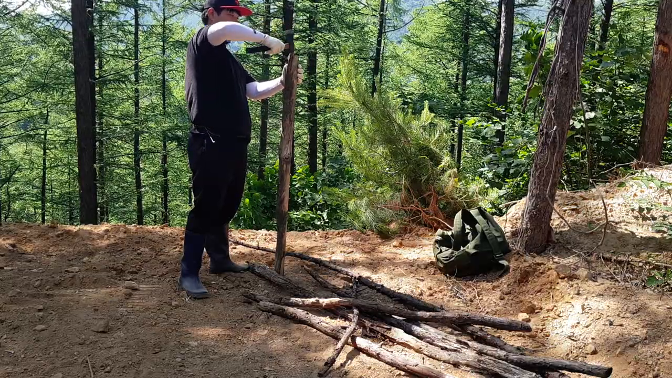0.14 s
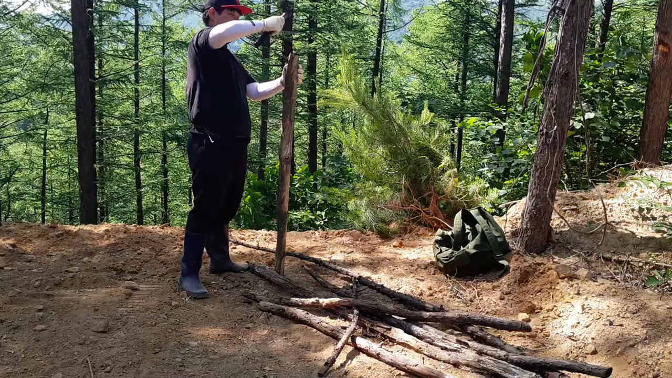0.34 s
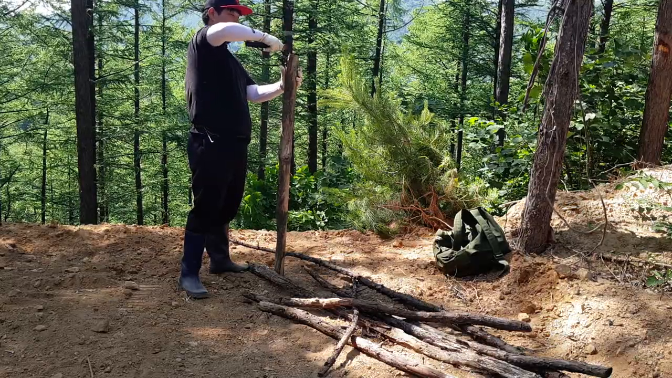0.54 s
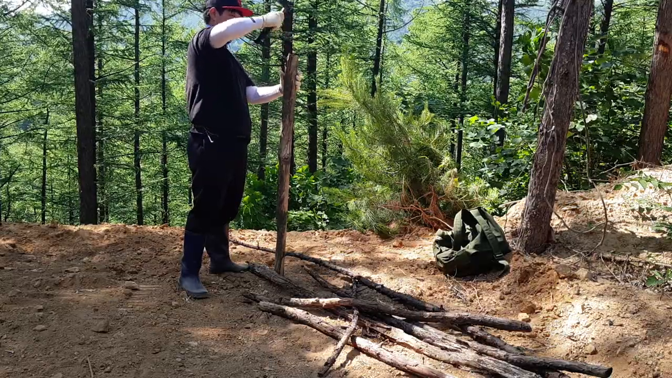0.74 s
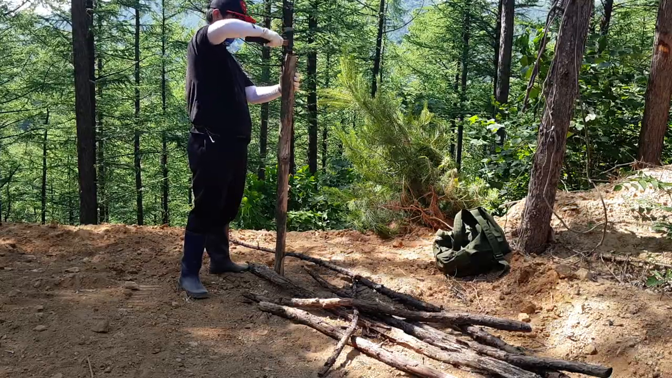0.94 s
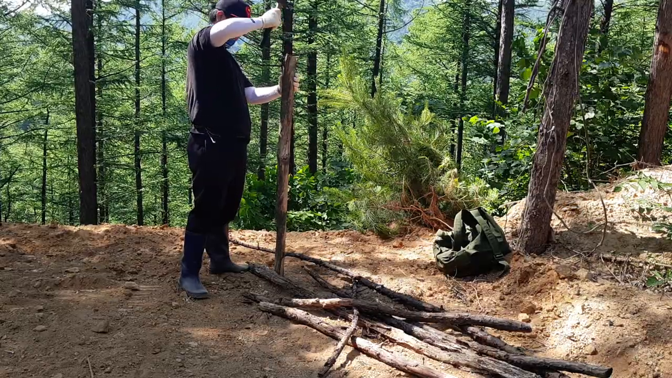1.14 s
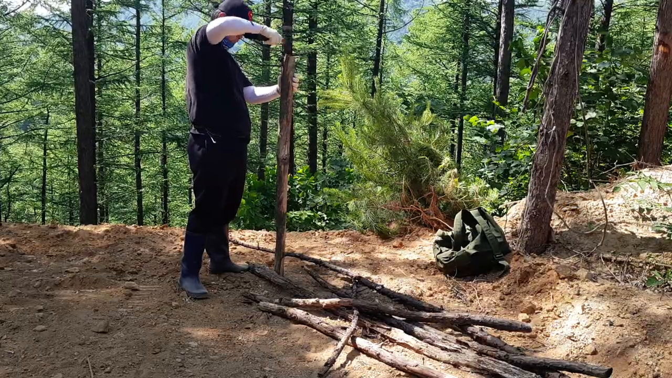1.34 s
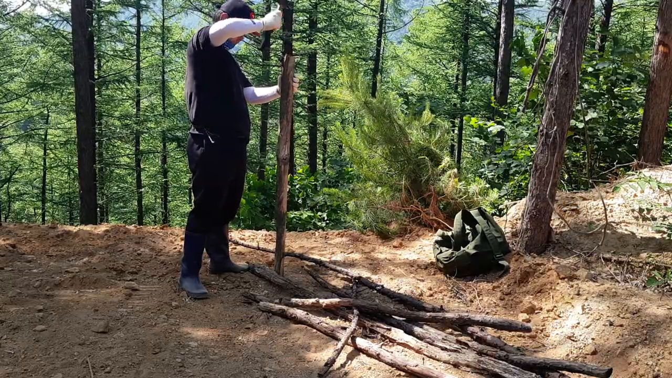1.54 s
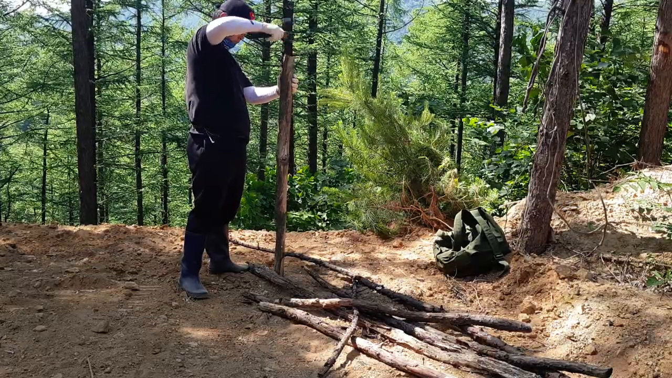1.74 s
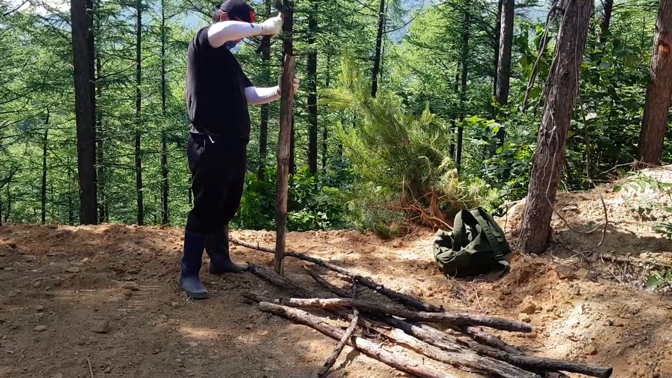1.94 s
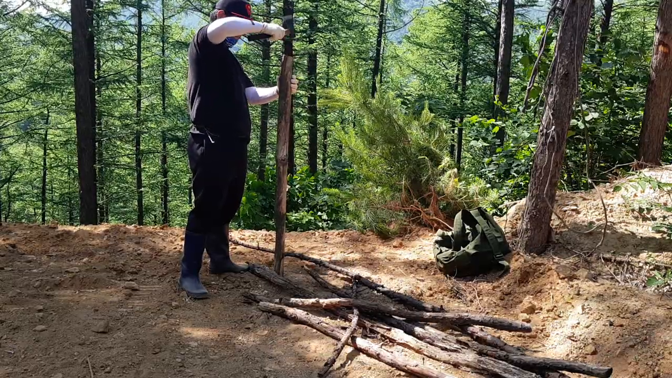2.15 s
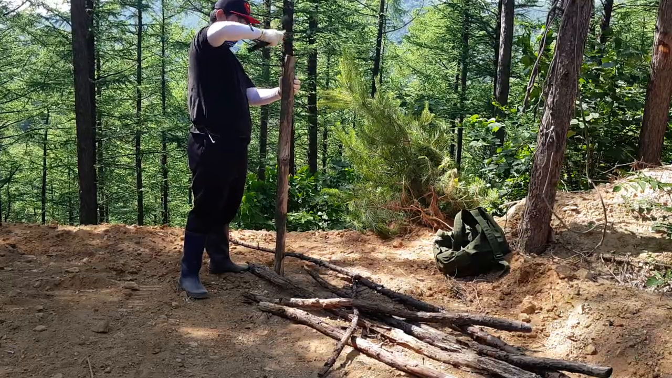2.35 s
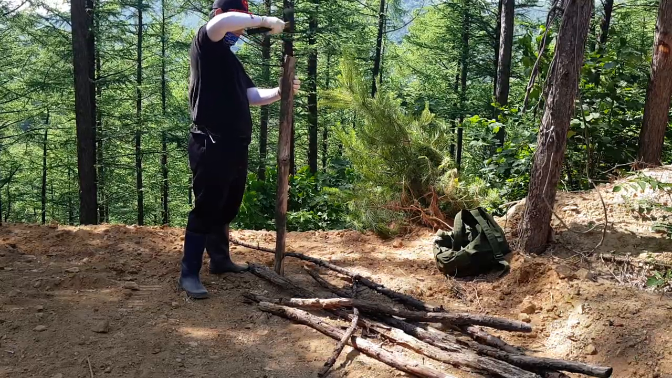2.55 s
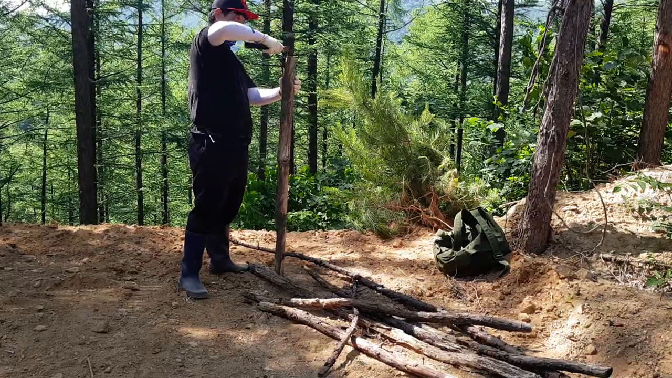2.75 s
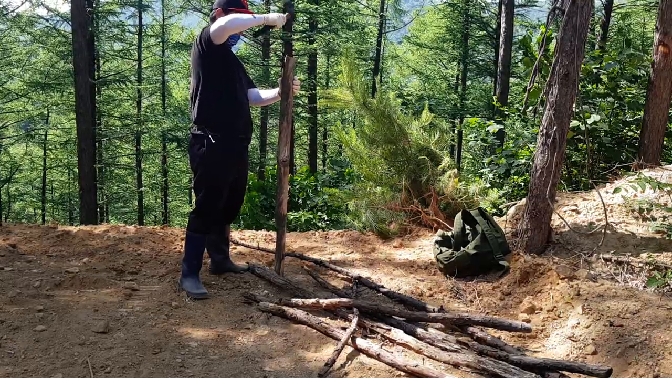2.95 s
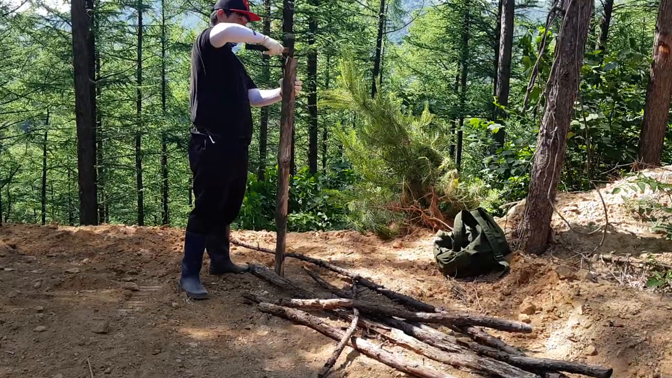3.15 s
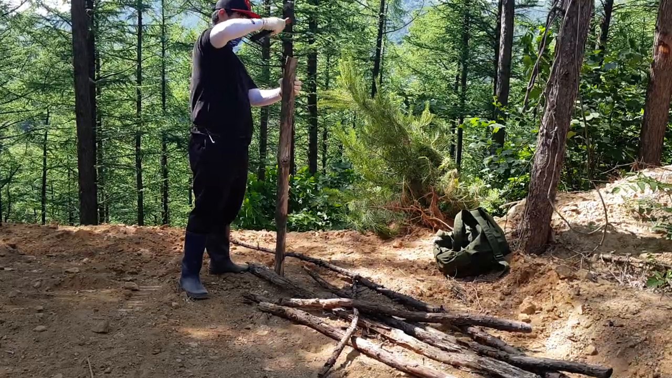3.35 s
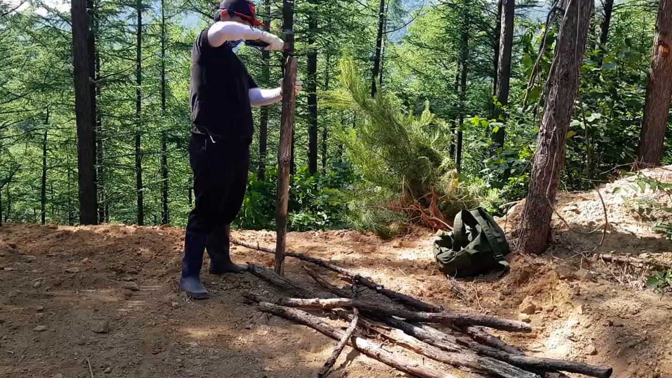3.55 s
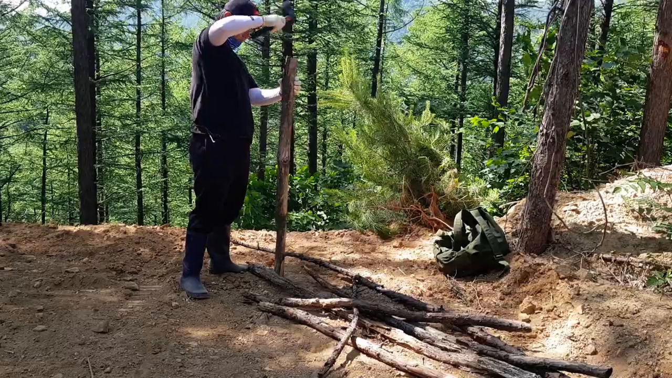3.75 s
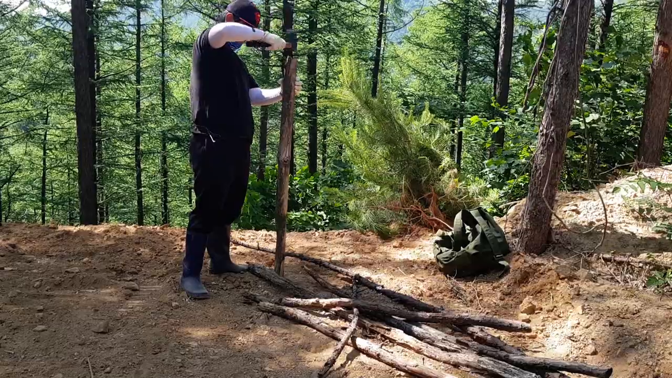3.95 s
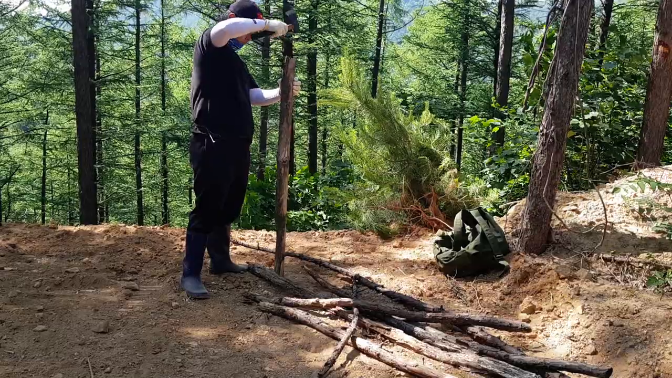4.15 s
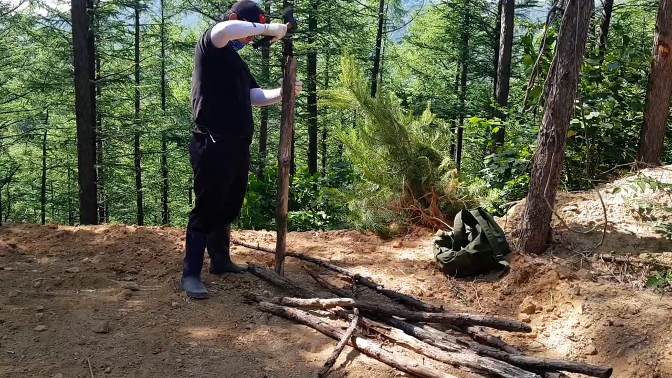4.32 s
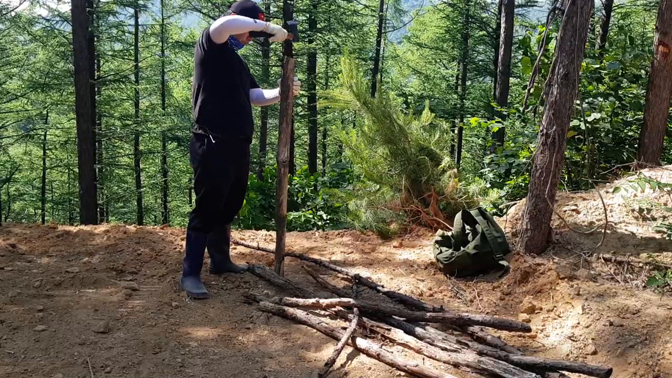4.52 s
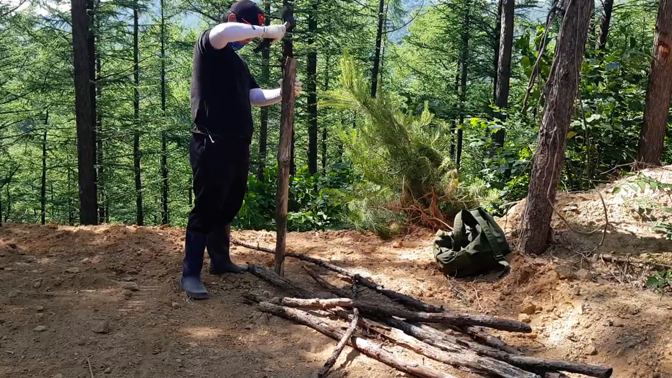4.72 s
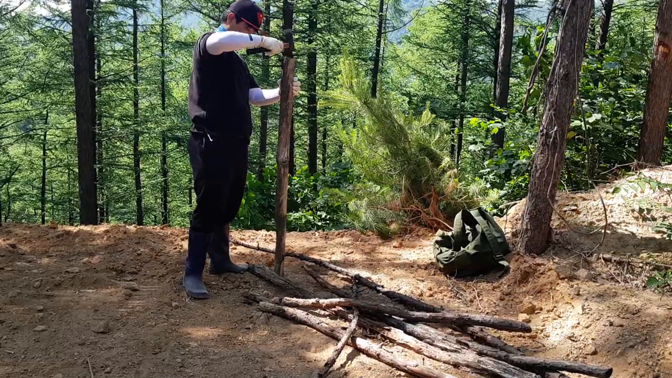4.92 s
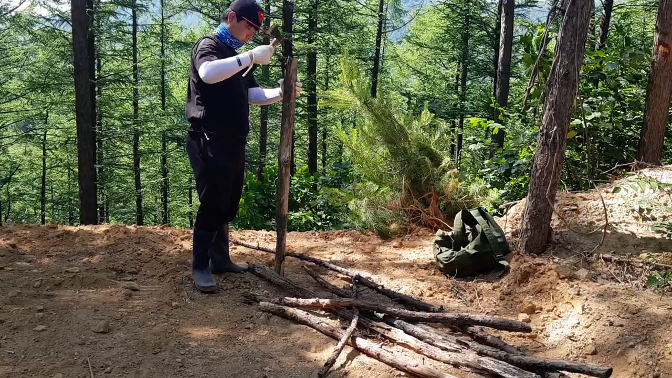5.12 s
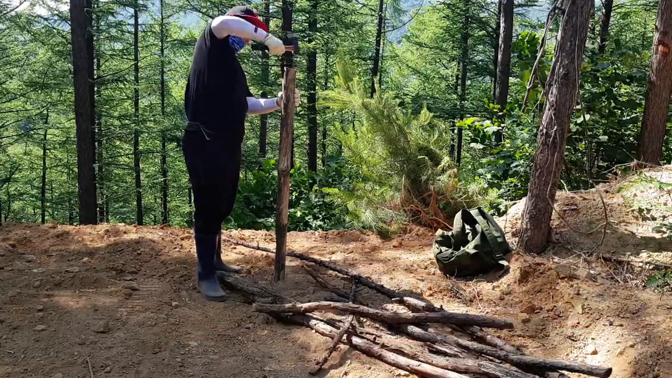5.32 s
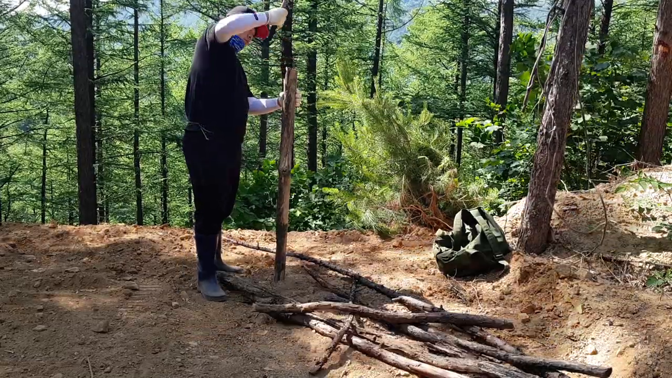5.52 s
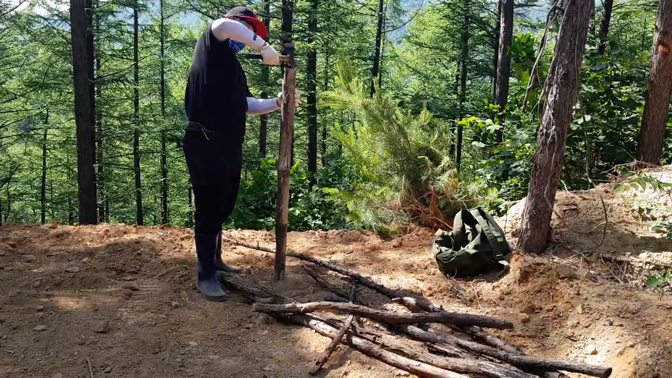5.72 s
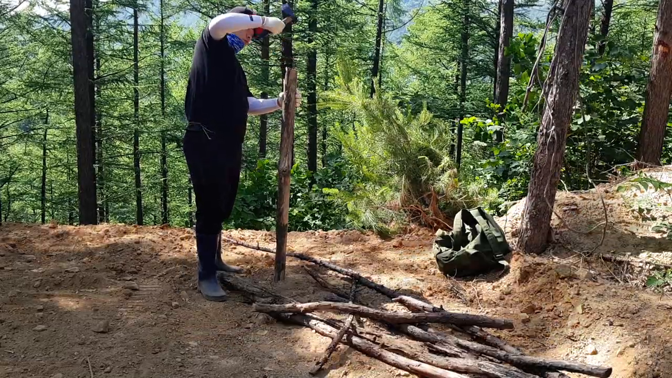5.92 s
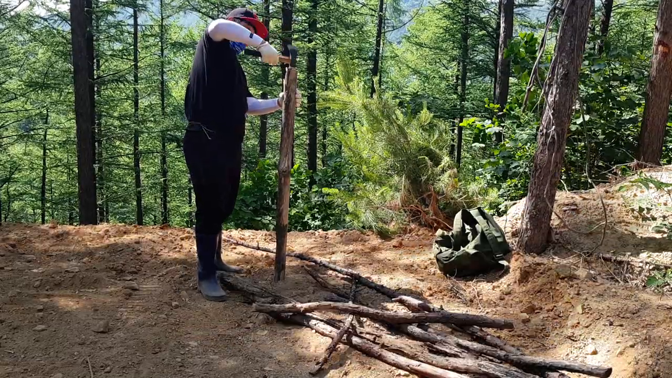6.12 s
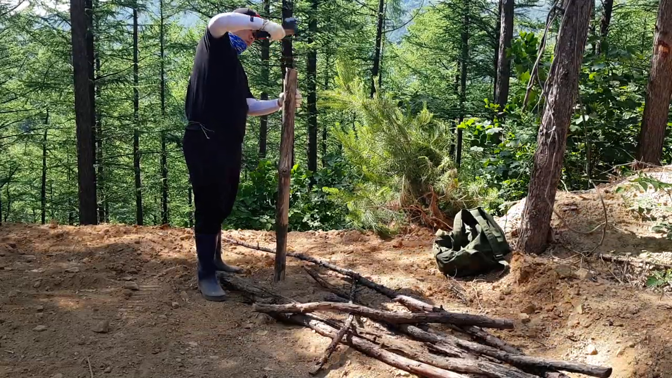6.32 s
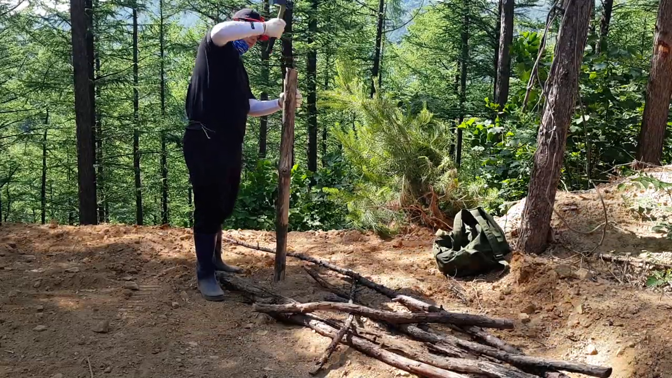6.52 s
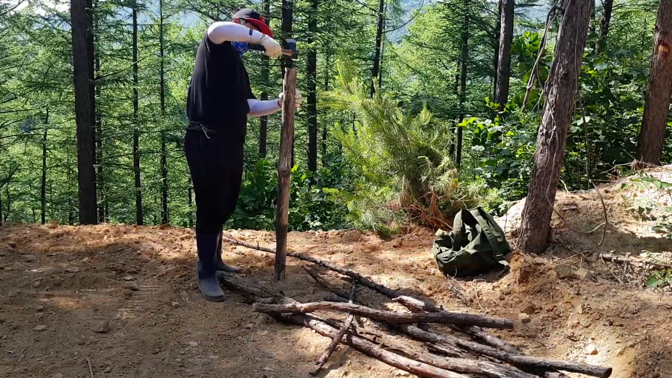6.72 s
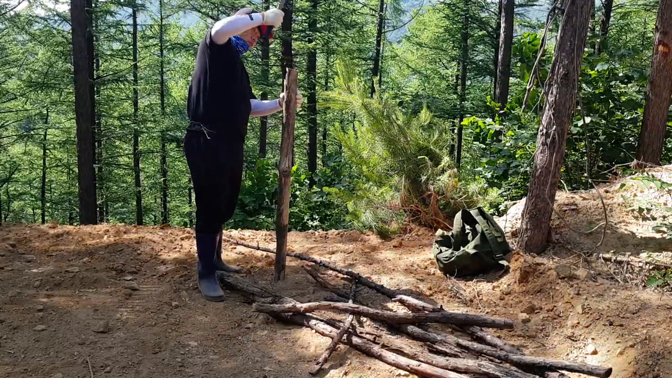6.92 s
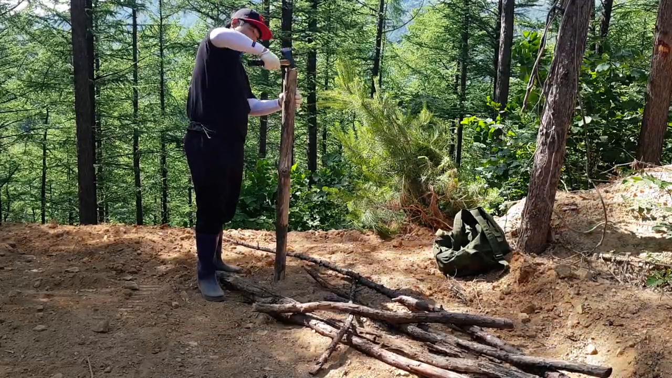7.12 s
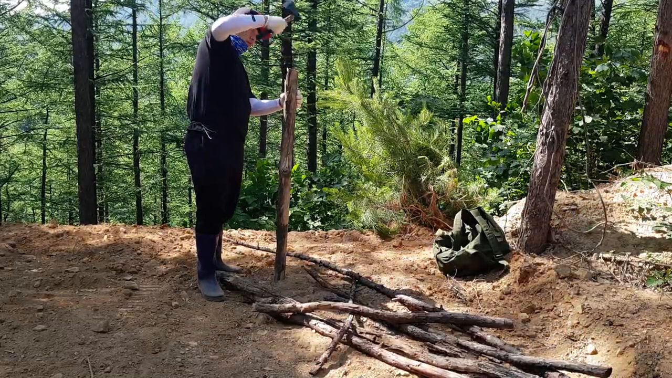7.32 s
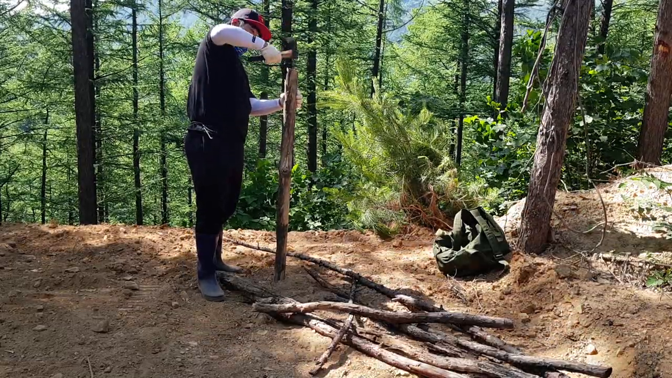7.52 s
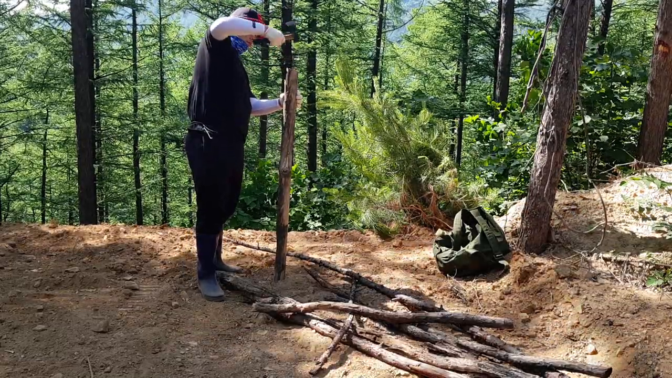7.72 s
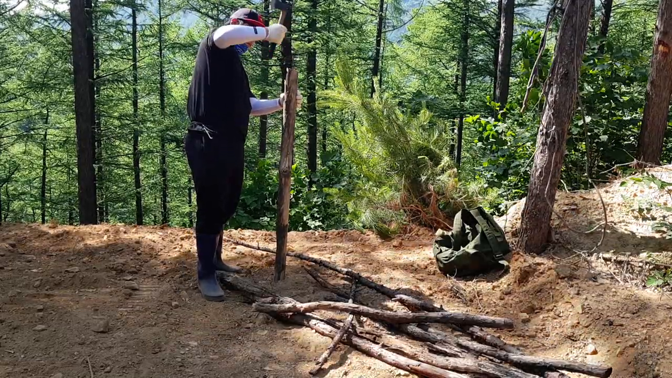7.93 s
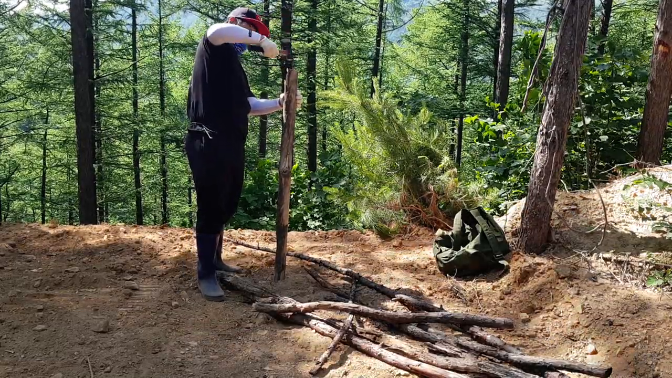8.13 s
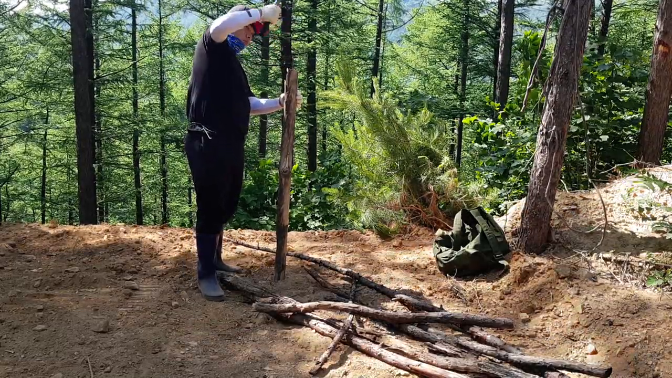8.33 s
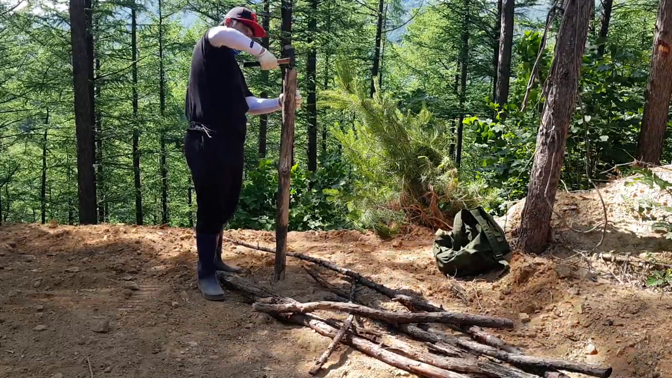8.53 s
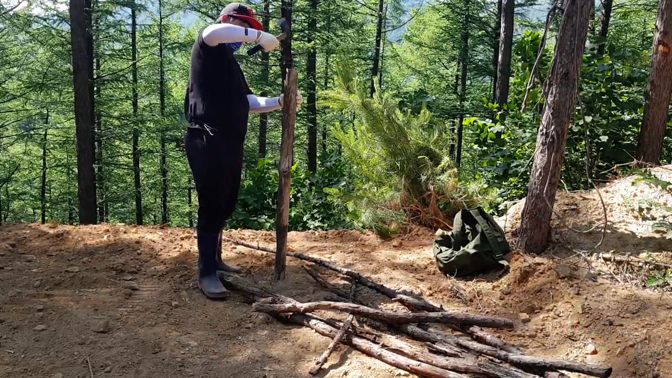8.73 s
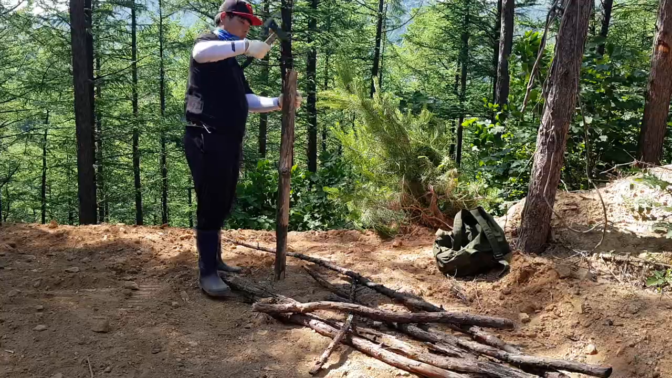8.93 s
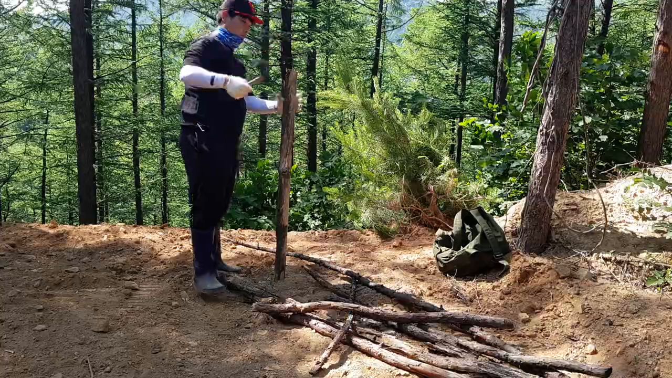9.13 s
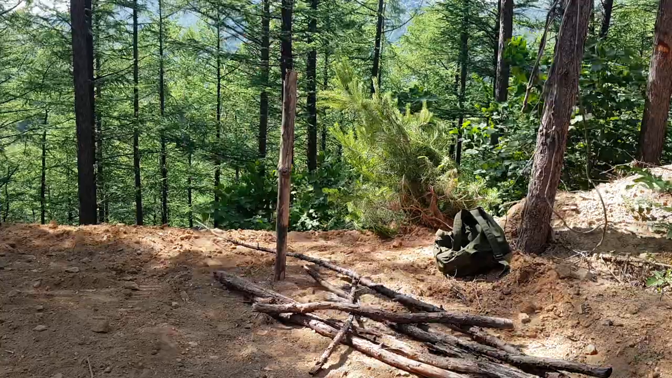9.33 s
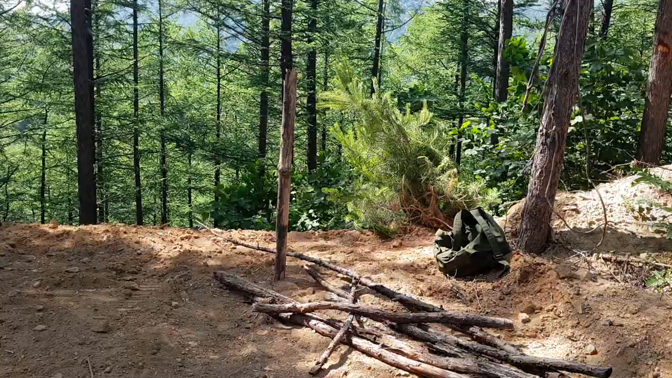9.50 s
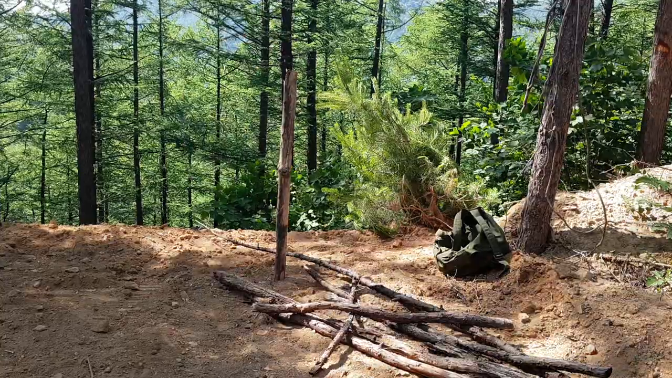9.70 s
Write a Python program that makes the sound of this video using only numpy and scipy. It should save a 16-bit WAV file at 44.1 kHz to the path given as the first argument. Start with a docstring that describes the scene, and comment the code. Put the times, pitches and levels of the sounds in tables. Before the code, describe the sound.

The scene opens on the fading echo of an earlier blow in a forest. From 0.16 s a hammer hits a wooden stake a few metres away, a little left, roughly every 0.4 s. Each hit is a short woody crack with a slight steel ping, a soft low thud in the soil and a scattered half-second echo from the trees; force and brightness vary. A far, hoarse crow caws once at 0.15-0.5 s. Low wind flutters on the microphone, strongest around 1-3 s, moving left to right. Very faint rising bird whistles come at 2.3 and 3.05 s, small knocks at 2.8 and 4.85 s. Sound drops out at 5.27-5.39 s, cutting the start of a strong blow. Blows continue about every 0.45 s, slightly lower toned, until a last strong one at 8.6 s. Its echo fades; after a tiny dropout at 9.25 s, light hiss, faint breeze and soft scuffs remain.

```python
"""In a conifer forest, a few metres from the microphone, a wooden stake is hammered into the earth.
Each blow is a noise crack, decaying sines for the wood and the steel head, and a sinking thump in the soil.
Sparse random echoes stand for the trunks that scatter it back; small ticks fall between the blows.
Filtered noise makes wind rumble at the microphone and a faint hiss of air. Far off, a crow's harmonics
make one caw and a small bird whistles upward in gliding sines. The sound drops out twice."""
import sys
import numpy as np
from scipy import signal
from scipy.fft import rfft, irfft
from scipy.io import wavfile
from scipy.ndimage import uniform_filter1d

SR = 44100
rng = np.random.default_rng(int(sys.argv[2]) if len(sys.argv) > 2 else 0)


def wav_record(signal):
    """Record a signal, one row per channel, as 16-bit PCM in the file named by sys.argv[1]."""
    frames = np.transpose(np.atleast_2d(signal))
    bounded = np.clip(frames, -1, 1)
    # unit amplitude maps onto the largest positive 16-bit level
    quanta = np.round(bounded * 32767).astype(np.int16)
    wavfile.write(sys.argv[1], SR, quanta)


N = 434826
TIME = np.arange(N) / SR
PORTS = 2  # left and right of the microphone

# Hammer blows on the stake, a few metres off. Each row: start in seconds, force in dB,
# belly in dB (the low modes of the wood), squareness in dB (a square hit is brighter), rebound delay
# in seconds, frequency favoured by the landing spot in Hz, lower and upper ping of the head in dB
# (added to the head's own levels).
BLOWS = [(0.16, 0, -6, -5.5, 0.0022, 3650.0, -14.5, -9.0), (0.514, -5, 6, -0.5, 0.0018, 1772, -9.5, -16.5),
         (0.917, 5, -8, -3.5, 0.001, 2700.0, 3, -18.5), (1.2763, -13.0, 29.5, 15.5, 0.0025, 1573, 3, -1.5),
         (1.656, 3.5, -14.5, 0.5, 0.0011, 1364, 3.5, -14), (2.031, 0, -2, 2.5, 0.0025, 1810, -5, -4.5),
         (2.404, -2, 8, 11.5, 0.0006, 800.0, -0.5, 3.0), (2.779, -2.5, 6, 14.5, 0.0028, 3650.0, -0.5, 9.0),
         (3.18, -4, 14, 15, 0.0032, 3760, 2.5, -4), (3.5884, -3.0, 10.5, 12.5, 0.00062, 3650.0, -9, -1),
         (3.992, -1, -0.5, 8.5, 0.0015, 3650.0, -13.5, 13.5),
         (4.3958, -3.5, 5.5, 19, 0.0014, 1820, -13, -0.5),
         (4.7944, -9.0, 18.5, 24.5, 0.0013, 1860, -9.5, -21.5), (5.342, 7.5, -9.5, 11, 0.002, 2760, -8, 13),
         (5.7885, -4.0, 14, 19, 0.0007, 1780, 10, 14), (6.2444, 3, 6, 9.5, 0.0037, 1555, 5, 5.0),
         (6.72, -3.5, 12.5, 9, 0.0016, 825, 0.5, 11), (7.178, -3.5, 7.5, -2.5, 0.0023, 2336, -11, 10),
         (7.654, 1.5, -2, 6.5, 0.0023, 1155, -10, -15), (8.11, 1, -8, -1, 0.0018, 974, -22, -10),
         (8.6245, 6.5, -7, 2.5, 0.0023, 1148, -7.5, -1)]


def hammering():
    """Every blow heard direct, through the ground and scattered by the trees."""
    direct, echoes = np.zeros(N), np.zeros((PORTS, N))
    for row in BLOWS:
        s, sound = blow(row)
        add(direct, s, sound)
        add(direct, *thump(row))
        add(echoes, s, nearby(sound))
        add(echoes, *echo(row, sound))
        add(echoes, *linger(row))
    return ports(direct) + echoes


# Modes of the stake. Each row: frequency in Hz, level in dB with the first grip,
# level in dB with the second grip (both before the blow's drive), t60 in seconds.
STAKE_MODES = [(687.0, -30.5, -49.5, 0.072), (813, -22.5, -22.5, 0.024), (973, -18, -24.5, 0.028),
               (1140, -34, -23, 0.028), (1370, -13, -19.5, 0.023), (1760, -28, -19.5, 0.015),
               (1870.0, -24, -32.5, 0.028), (2320, -18.5, -25, 0.031), (2700.0, -20, -25.5, 0.023),
               (3055, -30.5, -29, 0.036), (3076, -29, -26, 0.016), (3656, -31.0, -26, 0.019)]
REGRIP_S = 5.3  # the second grip starts
# Main note of the stake, which sinks as the grip changes. Each row: time in seconds, frequency in Hz.
MAIN_HZ = [(5.3, 1602), (6.1, 1488)]
MAIN_DB, MAIN_T60 = -15, 0.035  # before the blow's drive; s
# Pitches of the steel head's modes in Hz: the first is the lower ping, the rest make the upper ping.
HEAD_HZ = [4434, 5432, 9590]
# Modes of the steel head, in the order of HEAD_HZ. Each row: level in dB before the blow's ping level,
# t60 in seconds.
HEAD_MODES = [(-45, 0.18), (-47, 0.096), (-68.5, 0.28)]
# Colour of the contact crack. Each row: frequency in Hz, relative density in dB per Hz.
CRACK_COLOUR = [(100, -21), (300, -2.5), (1400, 2.5), (3000, -7.5), (5500, -13), (7500, -27), (12000, -26),
                (16000, -36)]
FAVOUR_DB, FAVOUR_WIDTH_HZ = 7, 150  # the landing spot drives the modes near one frequency harder


def blow(row, contact=0.0016, again=0.49, crack_db=-17.0, crack_t60=0.032, rattle=.9):
    """The head meets the stake, bites, and meets it again: wood and steel modes ring, the fibres crack."""
    s, *_, rebound, favoured_hz, lower_db, upper_db = row
    t = seconds(.5)
    grip_modes = [(hz, first if s < REGRIP_S else second, t60) for hz, first, second, t60 in STAKE_MODES]
    modes = sorted(grip_modes + [(*curve(MAIN_HZ, s), MAIN_DB, MAIN_T60)])
    wood = np.zeros(len(t))
    for k, (hz, db, t60) in enumerate(modes):
        favour = FAVOUR_DB * np.exp(-np.square((hz - favoured_hz) / FAVOUR_WIDTH_HZ))
        # neighbouring bending modes start in opposite directions
        wood += (-1) ** k * ring(t, hz, db + colour(row, hz) + favour, t60)
    # the second contact feeds some modes and checks others
    second_contact = np.interp(t - rebound, t, wood, left=0)
    wood = (wood + again * second_contact) / np.hypot(1, again)

    steel = np.zeros(len(t))
    for k, (hz, (db, t60)) in enumerate(zip(HEAD_HZ, HEAD_MODES)):
        steel += ring(t, hz, db + (upper_db if k else lower_db), t60)
    steel *= 1 + rattle * noise(len(t), below(90))  # the ring is rough

    crack = noise(len(t), lambda f: read(CRACK_COLOUR, f))
    fibres = coloured(crack, lambda f: colour(row, f))
    fibres *= gain_of(crack_db) * decay(t, crack_t60)
    return s, (wood + steel + fibres) * np.minimum(t / contact, 1)


# How a blow drives the wood. Each row: frequency in Hz, then the slopes in dB per dB of force,
# dB per dB of belly and dB per dB of squareness.
DRIVE = [(453, 1, 0.4849, -0.2), (1020, 1, 0.5622, 0), (1630, 1, 0.1743, 0), (2490, 1, 0, 0.8944),
         (4500, 1.1, 0, 0.6481)]


def colour(row, hz):
    """Drive in dB: it grows with force; where and how squarely the head lands favours low or high modes."""
    f, *slopes = np.transpose(DRIVE)
    return sum(amount * read(np.transpose([f, slope]), hz) for amount, slope in zip(row[1:4], slopes))


def thump(row, db=-31.0, arrival=0.016, width=0.0082, start_hz=150, end_hz=55, sag=0.016):
    """The soil takes the push; its slow low waves arrive after the fast ones."""
    t = seconds(.125)
    hz = end_hz + (start_hz - end_hz) * np.exp(-t / sag)
    swell = np.exp(-np.square((t - arrival) / width)) * np.minimum(t / 0.013, 1)
    return row[0], gain_of(db) * swell * sine(np.cumsum(hz) / SR)


# The stake stands to the left of the microphone. Each row: frequency in Hz, left over right in dB.
SIDE_DB = [(80, 0.5), (350, 4.5), (1500, 4.5), (4500, 6.5), (8000, -0.5)]


def ports(x, turn_hz=8500, spread=0.23, treble_turn=1.9):
    """Two microphone ports: the left is mostly louder, and their phases part most in the top treble."""
    hz = np.fft.rfftfreq(N, 1 / SR)
    # phase lag of the right port in radians
    lag = spread * np.minimum(hz / 2500, 1) + treble_turn / (1 + np.exp(-(hz - turn_hz) / 900))
    side = gain_of(read(SIDE_DB, hz) / 2)
    return irfft(rfft(x) * np.array([side, np.exp(-1j * lag) / side]), N)


# Single echoes from the nearest trunks. Each row: delay in seconds, level in dB.
TRUNK_ECHOES = [(.024, -29.5), (.053, -33), (0.089, -34.5), (0.111, -36.5)]


def nearby(sound, db=-14, t60=0.1):
    """Early reflections from the ground, the worker and the woodpile, and single ones from near trunks."""
    t = seconds(.25)
    sparse = rng.random((PORTS, len(t))) < 1500 / SR  # about 1500 echoes a second
    taps = rng.standard_normal((PORTS, len(t))) * sparse * (t > .005)
    taps = gain_of(db) * evened(taps * decay(t, t60)) / np.sqrt(len(t))
    for delay, level in TRUNK_ECHOES:
        add(taps, delay, gain_of([level]))
    return through(sound, taps)


# Colour of the forest's echo. Each row: frequency in Hz, relative density in dB per Hz.
ECHO_COLOUR = [(200, -8), (900, -14), (1250, -17.5), (1580, 3), (1900, -14), (2400, -7), (3000, -8),
               (4000, -18.5), (5500, -25), (7500, -37)]


def echo(row, sound, diffuse_db=-44, ringing_db=-22):
    """The forest returns the blow: partly with its own ring, partly evened out over all directions."""
    taps = trunks()
    diffuse = coloured(taps, lambda f: diffuse_db + read(ECHO_COLOUR, f) + colour(row, f))
    # the ringing part takes the two ports' echoes swapped
    ringing = gain_of(ringing_db) * through(sound, taps[::-1])[:, :SR] / np.sqrt(SR)
    return row[0] + .004, (diffuse + ringing)[:, :round(.9 * SR)]


ECHO_T60 = 0.42  # s


def trunks(build=0.12):
    """Dense scattered echoes in faint patches; they swell as more trunks answer, then die evenly."""
    t = np.arange(SR) / SR
    sparse = rng.random((PORTS, SR)) < 6000 / SR  # about 6000 echoes a second
    taps = rng.standard_normal((PORTS, SR)) * sparse
    slow_db = 1.5 * noise(SR, below(45))
    single_db = 2 * np.minimum(rng.exponential(1, (PORTS, SR)), 4)  # some echoes stand out
    taps *= gain_of(slow_db + single_db)
    taps *= (1 - np.exp(-t / build)) * decay(t, ECHO_T60)
    z = signal.stft(taps, nperseg=256)[-1]
    z *= gain_of(1.8 * patches(z, frames=12))
    return evened(signal.istft(z)[-1][:, :SR])


LINGER_DB, LINGER_WIDTH_HZ, LINGER_T60 = -64, 85, 1.8  # level at 0 dB of force; Hz; s


def linger(row, build=.06, growth=0.35):
    """The stake's main note hangs on among the trees: a faint, blurred trace from one blow to the next."""
    s, force, *_ = row
    t = np.arange(SR) / SR
    note = noise((PORTS, SR), around(*curve(MAIN_HZ, s), LINGER_WIDTH_HZ))
    shape = (1 - np.exp(-t / build)) * np.square(np.minimum(2 * (1 - t), 1))
    return s, note * shape * gain_of(LINGER_DB + growth * force) * decay(t, LINGER_T60)


# Small knocks, twig snaps and scuffs on the soil. Each row: start in seconds, level in dB,
# centre frequency in Hz, t60 in seconds.
TICKS = [(0.542, -40, 3870, 0.026), (2.83, -33, 1067, 0.041), (4.847, -29.5, 1080, 0.04),
         (9.431, -57.5, 4500, .026), (9.545, -63.5, 600, 0.075), (9.622, -61, 480, .18),
         (9.692, -59, 895, 0.091), (9.722, -49.5, 550, 0.2), (9.789, -49, 562, 0.13)]


def ticks(narrow_db=6):
    """Short decaying bursts of noise from twigs, grit and loose wood."""
    out, t = np.zeros((PORTS, N)), seconds(.2)
    for s, db, hz, t60 in TICKS:
        burst = noise((PORTS, len(t)), hump(hz, narrow_db))
        add(out, s, burst * gain_of(db) * decay(t, t60))
    return out


# Spells of breeze on the microphone. Each row: start in seconds, end in seconds, relative level in dB.
BREEZES = [(0.962, 1.695, -44.5), (2.056, 3.0, -42), (3.89, 5.282, -49), (5.395, 5.644, -52.5),
           (6.187, 7.078, -54.5), (9.418, 9.883, -53.5)]
CALM_DB, BREEZE_RISE_S, BREEZE_FALL_S = -69, 0.2, 0.39  # relative level between the spells
# Single buffets on the microphone. Each row: middle in seconds, relative level in dB,
# half length in seconds, centre frequency in Hz.
GUSTS = [(0.61, -55, 0.035, 76), (0.894, -41.5, 0.031, 74), (1.117, -26, 0.045, 74.5),
         (1.171, -29, 0.03, 128.4), (1.252, -29, 0.044, 69.8), (2.009, -29.5, 0.01, 119),
         (2.097, -36.5, 0.022, 76.8), (2.486, -39, 0.043, 130), (2.638, -34, 0.029, 64.6),
         (4.094, -33, 0.027, 94.4), (4.374, -36.5, 0.019, 100), (5.062, -45.5, 0.085, 121),
         (6.176, -51.5, .04, 98), (8.243, -66, 0.14, 154), (8.914, -58, 0.093, 167.4),
         (9.282, -45, 0.032, 55), (9.697, -41.5, 0.014, 80), (9.784, -40.5, 0.0073, 85)]
# Colour of the rumble. Each row: frequency in Hz, relative density in dB per Hz.
RUMBLE_COLOUR = [(20, -13), (45, 5), (85, 5), (220, -12.5), (350, -20), (900, -63.5)]
# the wind meets the left port, then veers to the right one: level difference between the ports
VEER_S, LEFT_FIRST_DB, RIGHT_LATER_DB = 1.247, 25.5, 12.5


def wind(db=-0.5, narrow_db=7.5, split_hz=130, upper_db=-4):
    """Turbulence at each port on its own: spells of lumpy rumble, with single buffets on top."""
    strength = gain_of(CALM_DB)
    for start, end, level in BREEZES:
        rise = np.clip((TIME - start) / BREEZE_RISE_S + 1, 0, 1)
        fall = np.exp(-np.maximum(TIME - end, 0) / BREEZE_FALL_S)
        strength = np.maximum(strength, gain_of(level) * rise * fall)
    lumps_db = 4 * np.minimum(noise((PORTS, N), below(14)), 1.6)
    rumble = noise((PORTS, N), lambda f: read(RUMBLE_COLOUR, f))
    deep = coloured(rumble, below(split_hz))
    upper = (rumble - deep) * gain_of(upper_db)
    out = strength * gain_of(db + lumps_db) * (deep + upper)
    t = np.arange(SR) / SR - .5
    for s, level, half, hz in GUSTS:
        buffet = noise((PORTS, SR), hump(hz, narrow_db))
        add(out, s - .5, buffet * gain_of(level) * np.exp(-.5 * np.square(t / half)))
    veer = [VEER_S - BREEZE_FALL_S, VEER_S + BREEZE_FALL_S]
    pan = np.interp(TIME, veer, [LEFT_FIRST_DB, -RIGHT_LATER_DB])
    return eddies(out) * gain_of(np.array([pan, -pan]) / 2)


def eddies(x):
    """Breaks a rumble into separate lumps, each with its own pitch."""
    z = signal.stft(x, nperseg=2048)[-1]
    z *= gain_of(3.5 * np.minimum(patches(z, frames=3), 1.6) - 1)
    return signal.istft(z)[-1][:, :N]


# The crow's one call, far off among the trees. The row: start in seconds, level in dB,
# pitch at the top of the arch in Hz.
CAW = (0.14, -52.5, 347)
CAW_LENGTH_S, CAW_RISE_S, CAW_FALL_S = 0.365, .2, 0.04
CAW_TOP_AFTER_S, CAW_SAG_HZ_PER_S2 = .11, 1200  # the arch of its pitch


def crow(row, throat_hz=1400, throat_width_hz=470, beak_hz=3750, beak_db=-21, rough=0.45, wet=0.5):
    """One far, arching caw, hoarsest at its ends: wavering harmonics pass two resonances, blurred by trees."""
    s, level, top_hz = row
    t = seconds(CAW_LENGTH_S)
    turns = np.cumsum(top_hz - CAW_SAG_HZ_PER_S2 * np.square(t - CAW_TOP_AFTER_S)) / SR
    stack = np.zeros(len(t))
    for k in range(2, 13):
        harmonic = sine(k * turns + rng.random())
        waver = gain_of(4 * noise(len(t), below(16)))
        stack += harmonic * waver / np.sqrt(k)
    clear = np.sqrt(np.sin(np.pi * t / CAW_LENGTH_S))
    hoarse = (rough + 2 * (1 - clear)) * rng.standard_normal(len(t))
    drive = clear * evened(stack) + hoarse
    throat = coloured(drive, around(throat_hz, throat_width_hz))
    beak = gain_of(beak_db) * coloured(drive, around(beak_hz, throat_width_hz))
    shape = np.minimum(t / CAW_RISE_S, 1) * np.minimum((CAW_LENGTH_S - t) / CAW_FALL_S, 1)
    voice = evened(throat + beak) * shape * gain_of(level)
    out = wet * through(voice, trunks()) / np.sqrt(SR)
    add(out, 0, voice)
    return s, out


# A small bird's upward whistles, far off. Each row: start in seconds, level in dB relative to CHIRP_DB.
CHIRPS = [(2.289, -7), (3.046, 0.5)]
CHIRP_HZ, CHIRP_RISE_HZ_PER_S, CHIRP_LENGTH_S, CHIRP_DB = 3550, 9600, .125, -76  # starting pitch


def bird():
    """Thin, far whistles that all rise the same way, blurred by the trees."""
    out, t = np.zeros((PORTS, N)), seconds(CHIRP_LENGTH_S)
    turns = np.cumsum(CHIRP_HZ + CHIRP_RISE_HZ_PER_S * t) / SR
    whistle = sine(turns) * signal.windows.tukey(len(t))
    far = through(whistle, trunks()) / np.sqrt(SR)
    add(far, 0, whistle)
    for s, db in CHIRPS:
        add(out, s, gain_of(CHIRP_DB + db) * far)
    return out


# Colour of the still forest air. Each row: frequency in Hz, relative density in dB per Hz.
AIR_COLOUR = [(400, 4), (1100, -6), (2000, -10), (4500, -3.5), (7500, -19.5), (12000, -10.5)]
# Level of the air at the microphone. Each row: time in seconds, level in dB.
AIR_DB = [(0, -70.5), (9.2, -67.5), (9.8, -60.5)]


def air():
    """The faint hiss of the forest air, as coloured noise."""
    return noise((PORTS, N), lambda f: read(AIR_COLOUR, f)) * gain_of(*curve(AIR_DB))


def gain_of(db):
    """Decibels to amplitude."""
    return 10 ** (np.asarray(db) / 20)


def evened(x):
    """Scales to rms 1."""
    return x / np.sqrt(np.mean(x ** 2) + 1e-20)


def read(points, hz):
    """A spectrum table at the given frequencies, interpolated over log frequency."""
    f, value = np.transpose(points)
    return np.interp(np.log(hz + 1), np.log(f), value)


def curve(rows, t=TIME):
    """The columns of a curve table at the given times."""
    s, *columns = np.transpose(rows)
    return [np.interp(t, s, c) for c in columns]


def add(mix, s, sound):
    """Mixes a sound in at time s."""
    part = mix[..., max(round(s * SR), 0):][..., :sound.shape[-1]]
    part += sound[..., :part.shape[-1]]


def coloured(x, db_at):
    """Filters x by a function from Hz to dB."""
    size = x.shape[-1]
    return irfft(rfft(x) * gain_of(db_at(np.fft.rfftfreq(size, 1 / SR))), size)


def noise(shape, db_at):
    """Noise of rms 1 with the given colour."""
    return evened(coloured(rng.standard_normal(shape), db_at))


def ring(t, hz, db, t60):
    """One struck mode: a decaying sine."""
    return gain_of(db) * decay(t, t60) * sine(hz * t)


def seconds(length):
    """Sample times up to the given length."""
    return np.arange(round(length * SR)) / SR


def decay(t, t60):
    """A gain that falls 60 dB in t60."""
    return gain_of(-60 * t / t60)


def sine(turns):
    """A sine of a phase in turns."""
    return np.sin(2 * np.pi * turns)


def below(hz):
    """A low-pass colour."""
    return lambda f: -20 * np.log10(1 + (f / hz) ** 4)


def around(hz, width):
    """A resonant colour."""
    return lambda f: -20 * np.log10(1 + ((f - hz) / width) ** 2)


def hump(hz, narrow_db):
    """A broad colour, narrow_db down an octave to either side."""
    return lambda f: -narrow_db * np.log2((f + 1) / hz) ** 2


def through(sound, taps):
    """Sends a sound through each port's echoes."""
    return signal.fftconvolve(sound[None], taps, axes=1)


def patches(z, frames):
    """Chance of rms 1 over a short-time spectrum, in patches a few bins wide and some frames long."""
    chance = rng.standard_normal(z.shape[1:])
    over_bins = uniform_filter1d(chance, size=3, axis=0)
    return evened(uniform_filter1d(over_bins, size=frames))


def scene(opening_db=-42):
    """The hammering over wind and forest; it opens on the dying echo of an earlier blow."""
    mix = hammering() + ticks() + wind() + bird() + air()
    earlier = coloured(trunks(), lambda f: opening_db + read(ECHO_COLOUR, f))
    add(mix, 0, earlier[:, SR // 5:SR * 9 // 10])
    add(mix, *crow(CAW))
    return mix


# Silent stretches. Each row: start in seconds, end in seconds.
GAPS = [(5.274, 5.389), (9.252, 9.272)]
EDGE_HZ = 16000  # upper band limit


def record(dry):
    """Peaks are capped at full scale, the sound drops out twice, then the top is cut by a steep low-pass."""
    live = np.ones(N)
    for start, end in GAPS:
        live[(TIME > start) & (TIME < end)] = 0
    held = np.clip(dry, -1, 1) * uniform_filter1d(live, size=40)  # short fades at the gaps' edges
    low_pass = signal.firwin(511, EDGE_HZ, window=("kaiser", 9), fs=SR)
    return signal.oaconvolve(held, low_pass[None], "same")


dry = scene()
out = record(dry)
wav_record(out)
```